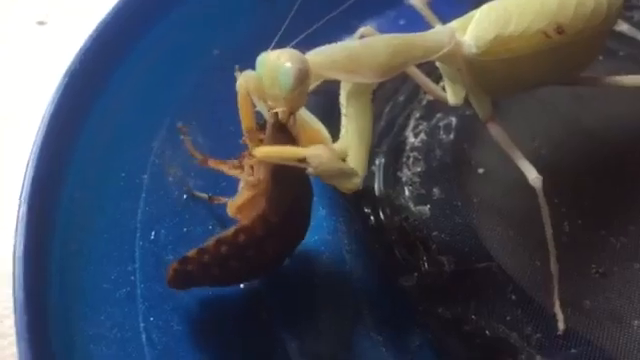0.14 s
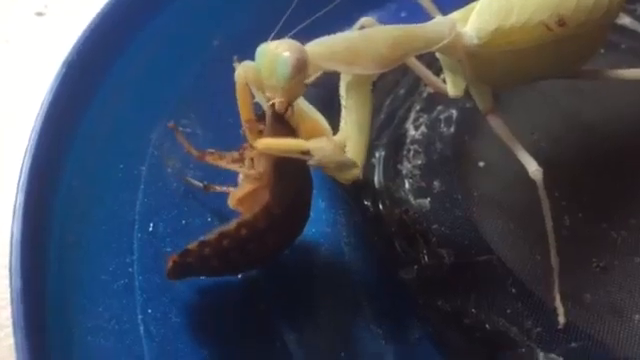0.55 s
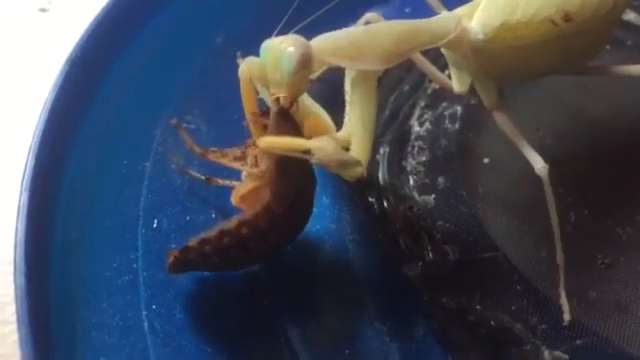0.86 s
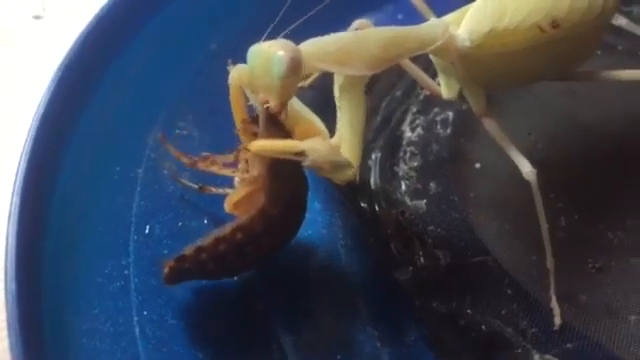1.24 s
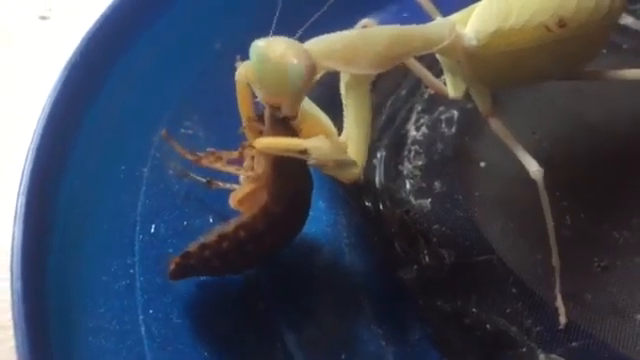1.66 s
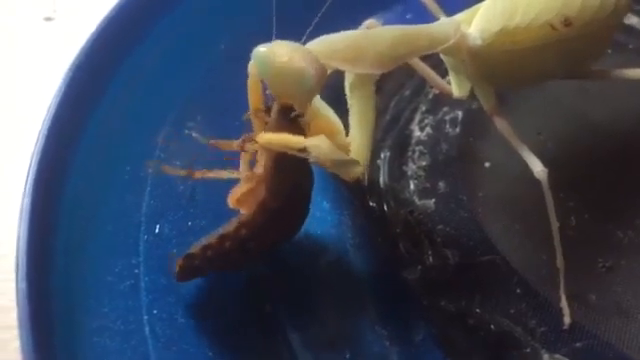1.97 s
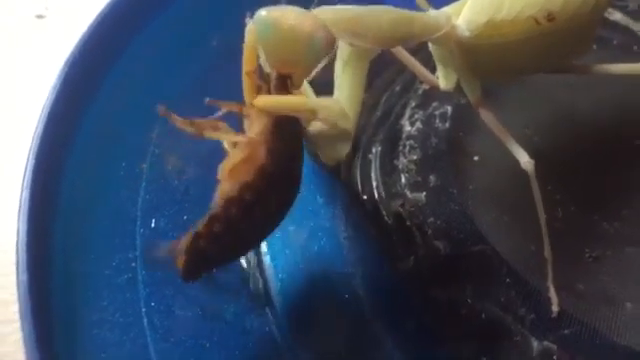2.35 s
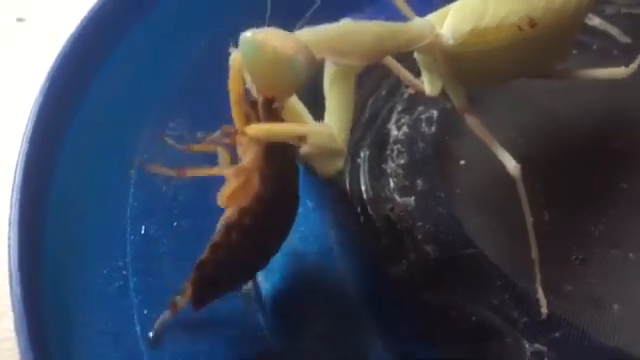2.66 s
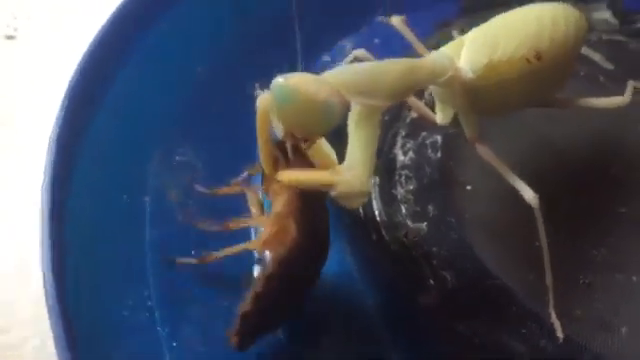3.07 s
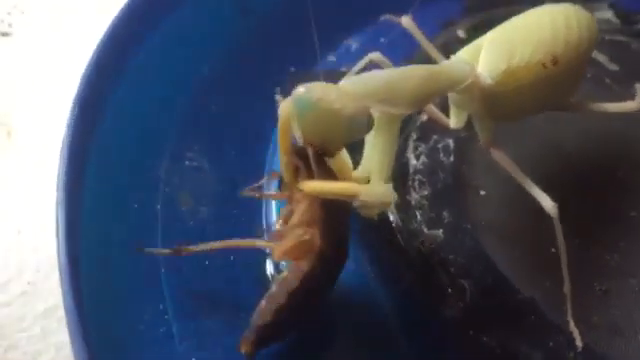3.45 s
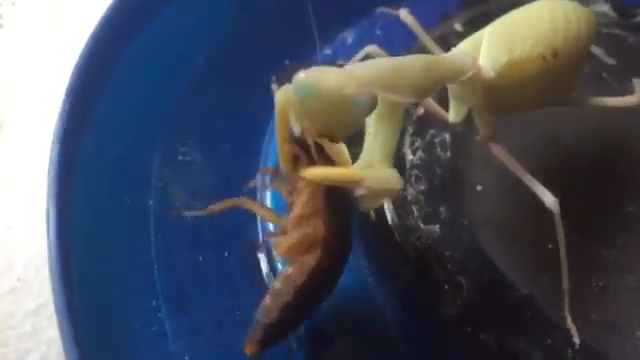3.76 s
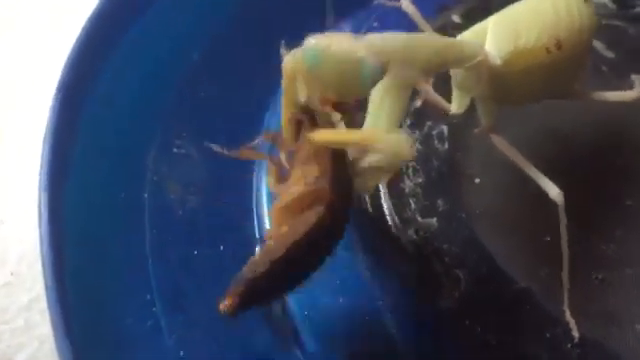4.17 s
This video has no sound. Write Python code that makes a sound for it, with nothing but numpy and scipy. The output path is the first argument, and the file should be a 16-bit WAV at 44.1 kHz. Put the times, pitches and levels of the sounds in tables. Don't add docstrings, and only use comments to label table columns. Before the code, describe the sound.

Sparse, tiny crisp ticks and short dry creaks of an insect chewing shell, very close, over a deep throbbing ventilation drone.

```python
import sys
import numpy as np
from scipy import signal
from scipy.fft import rfft, irfft
from scipy.io import wavfile
from scipy.ndimage import uniform_filter1d

SR = 44100
rng = np.random.default_rng(int(sys.argv[2]) if len(sys.argv) > 2 else 0)


def materialize(psi):
    bounded = np.clip(np.atleast_2d(psi).T, -1, 1)
    quanta = np.round(bounded * 32767).astype(np.int16)
    wavfile.write(sys.argv[1], SR, quanta)


def nominal_scale(level):
    x = np.asarray(level, float) / 20
    return 10 ** x


N = 190011

# start_s, peak_db,
# flake_hz, body_db
SHELL_SNAPS = [(0.0627, -29.5, 10540, -45), (0.0695, -48, 7500, -2), (0.0923, -32.5, 10400, -40),
               (0.1424, -35.5, 11500, -20), (.2426, -25.5, 12150, -21.5), (0.2517, -44, 9600, -8),
               (0.4658, -28.5, 10860, -27), (0.755, -35.5, 10160, -37), (1.083, -35.5, 12200, -16),
               (1.1635, -26, 11500, -41), (1.165, -39, 10700, -13), (1.2076, -48, 9100, -17),
               (1.211, -56, 11000, -20), (2.2988, -40, 7100, -24), (2.316, -38, 8100, -3),
               (2.3328, -56, 9000, 3), (2.6953, -32, 7700, -2), (2.6957, -47, 7700, -14),
               (2.876, -55, 12900, -10), (3.8432, -22.5, 13400, -21), (3.8434, -22.5, 9760, -14),
               (3.8528, -30, 9500, -31), (3.8803, -54, 9450, -13), (3.991, -62, 12100, -5)]
# start_s, peak_db, skid_ms, limb_hz, dish_db
LIMB_SKIDS = [(2.2391, -46.5, 3.5, 2500, -2), (2.245, -40.5, 2.45, 2400, -6),
              (2.2612, -48.5, 3.9, 2500, 0.1), (2.298, -34, 3.2, 3460, -2), (2.3035, -51, 9.0, 4400, -3),
              (2.312, -56, 1.4, 3400, -6), (2.3144, -31.5, 1.2, 3840, 7), (2.32, -57, 16, 3800, -1),
              (2.651, -62, 26, 3340, 3), (2.67, -45, 3.4, 3300, -7), (2.6963, -33, 2.5, 3210, -6.5),
              (2.798, -59, 1.9, 2300, -1), (3.241, -57.5, 4.5, 2320, -3), (3.385, -59, 14, 3000, 3),
              (3.5936, -48, 3.6, 2350, -0.5), (3.805, -57.5, 10, 3260, -1),
              (3.9322, -33.5, 9.9, 2410, -7.5), (4.0095, -51, 2.4, 3020, -9), (4.2794, -58, 3.7, 2210, -5),
              (4.3065, -47, 3.2, 2780, -3)]
# start_s, peak_db, drag_ms, plate_hz
PLATE_DRAGS = [
    (2.574, -55.5, 9.1, 2910),
    (2.693, -36.5, 3.8, 5170),
    (2.696, -32, 2.57, 4320),
    (2.697, -52, 2.3, 2260),
    (3.7476, -64.5, 6, 5530),
    (3.93, -46, 10, 4760),
    (3.935, -41.5, 4.7, 4950),
    (3.9995, -38.5, 3.6, 2970),
    (4.0043, -40, 4.2, 3060),
]
# start_s, peak_db, mode_hz, t60_s
SOFT_BUMPS = [
    (.09, -62, 410, .2),
    (1.216, -58, 960, .06),
    (3.5968, -46, 238, .1),
    (3.597, -50, 415, .11),
    (3.5972, -60, 610, .05),
]
# pitch_hz, density_db (per Hz)
DRONE_SPECTRUM = [(8.8, -66), (18, -21.5), (33, -17.5), (40, -6.5), (52, -9), (65, 7), (75, 11), (90, 5.5),
                  (108, -13.5), (129, -13), (166, -17), (199, -14.5), (262, -25), (340, -56), (580, -120)]
# pitch_hz, density_db (per Hz)
RUSH_SPECTRUM = [(150, -32), (260, 0), (316, -7.5), (396, -13), (437, -12.5), (602, -14), (701, -8.5),
                 (802, -7), (1200, -11.5), (1410, -16.5), (2200, -21.5), (2860, -50), (4840, -120)]
# pitch_hz, density_db (per Hz)
HISS_SPECTRUM = [(1290, -31), (2200, 1.5), (2470, -1), (2570, -3), (3320, -1.5), (4810, -6), (5440, -4.5),
                 (6470, -5.5), (8020, -9), (9770, -7), (10500, -15.5), (11200, -8.5), (12700, -11),
                 (15800, -12)]
# centre_s, change_db, half_length_s
DEEP_LULLS = [(.19, -7.5, 0.19), (.43, -6.5, 0.093), (.7, -16, 0.071), (.79, -3.5, 0.021),
              (.92, -17, 0.096), (1.1, -11, 0.11), (1.33, -3.5, 0.23), (1.68, -7.5, 0.052),
              (1.8, -2, 0.036), (1.9, -4, 0.31), (2.55, -5, 0.39), (2.81, -23, 0.063), (2.94, -6, 0.043),
              (3.2, -5.5, 0.27), (3.28, -4, 0.031), (3.5, -8, 0.21), (3.6, 4, 0.035), (3.78, -6.5, 0.23),
              (3.97, -6.5, 0.086), (4.15, -2.5, 0.21), (4.31, -5.5, 0.17)]
# centre_s, change_db, half_length_s
MIDDLE_GUSTS = [(0.0, 21.5, 0.02), (.2, 1.5, 0.088), (.48, 3, .08), (.82, 9, 0.059), (1.4, 6, 0.12),
                (1.9, 0.5, 0.19), (2.35, 4, 0.58), (2.94, 6, 0.045), (3.32, 4.5, 0.065), (3.64, 6, .08),
                (3.81, 4.5, .08), (4.04, 8, 0.2)]
# centre_s, change_db, half_length_s
UPPER_HUMS = [(.3, 1.5, 0.15), (.7, 6.5, 0.076), (.83, 6, 0.033), (.94, 6, 0.082), (1.35, 8, 0.28),
              (1.55, 5.5, 0.14), (1.68, 12, 0.054), (1.85, 7, 0.026), (3.28, 10, 0.052), (3.6, 12.5, 0.048),
              (3.74, 12, 0.036), (3.91, 8.5, 0.079), (4.04, 11.5, 0.084), (4.31, 2, 0.081)]


def snaps():
    out = np.zeros(N)
    t = np.arange(400) / SR
    click = (t == 0) * 1.0
    edge = peak_one(ring(ring(click, 8900, 0.00084), 17200, 0.0008))
    body = peak_one(ring(ring(click, 3230, 0.002), 5200, 0.003))
    late = np.maximum(t - 0.0005, 0)
    echo_burst = (late / 0.00068) * np.exp(1 - late / 0.00027)
    echo_tail = 0.27 * (late > 0) * np.exp(-late / 0.0023)
    for start_s, peak_db, flake_hz, body_db in SHELL_SNAPS:
        flake = ring(click, 0.85 * flake_hz, 5.0 / flake_hz)
        flake = ring(flake, flake_hz, 3.5 / flake_hz)
        flake = peak_one(ring(flake, 1.2 * flake_hz, 4.5 / flake_hz))
        tick = peak_one(flake + nominal_scale(-20) * edge + nominal_scale(body_db) * body)
        scatter = rng.standard_normal(len(t)) * (echo_burst + echo_tail)
        crackle = peak_one(np.convolve(scatter, tick)[:len(t)])
        crackle_db = -5 - 0.78 * (peak_db + 41)
        add(out, start_s, nominal_scale(peak_db) * (tick + nominal_scale(crackle_db) * crackle))
    return signal.sosfilt(signal.butter(4, 2700, "high", fs=SR, output="sos"), out)


def skids():
    out = np.zeros(N)
    t = np.arange(2000) / SR
    dish_hz = 4000
    slips = []
    for start_s, peak_db, length_ms, limb_hz, dish_db in LIMB_SKIDS:
        slips.append((start_s, peak_db, length_ms, limb_hz, dish_hz, dish_db))
    for start_s, peak_db, length_ms, plate_hz in PLATE_DRAGS:
        overtone_db = -8.5 - 6 * (plate_hz / 1000 - 3)
        slips.append((start_s, peak_db, length_ms, plate_hz, 1.933 * plate_hz, overtone_db))
    bright = signal.butter(2, [5500, 9000], "band", fs=SR, output="sos")
    for start_s, peak_db, length_ms, low_hz, high_hz, high_db in slips:
        phase = np.clip(t / (length_ms / 1000), 0, 1)
        envelope = np.sin(np.pi * phase ** 0.7) ** 0.5
        jerks, grit = rng.standard_normal((2, len(t))) * envelope
        low = peak_one(ring(ring(jerks, low_hz, 0.007), low_hz, 0.0014))
        high = peak_one(ring(ring(jerks, high_hz, 0.0049), high_hz, 0.0033))
        crunch = peak_one(ring(ring(grit, 3250, 0.00028), 5140, 0.00081))
        scratch = peak_one(signal.sosfilt(bright, grit) + 0.92 * grit)
        crunch_db = 1.5 - 1.4 * length_ms
        scratch_db = -12 - 0.91 * length_ms
        creak = low + nominal_scale(high_db) * high + nominal_scale(crunch_db) * crunch + nominal_scale(scratch_db) * scratch
        add(out, start_s, nominal_scale(peak_db) * peak_one(creak))
    return signal.sosfilt(signal.butter(6, 1800, "high", fs=SR, output="sos"), out)


def bumps():
    out = np.zeros(N)
    t = np.arange(SR // 4) / SR
    for start_s, peak_db, mode_hz, t60_s in SOFT_BUMPS:
        decay = nominal_scale(peak_db - 60 * t / t60_s)
        onset = 1 - np.exp(-t * mode_hz * 54)
        add(out, start_s, -decay * onset * np.sin(2 * np.pi * mode_hz * t))
    return out


def ring(x, hz, t60_s):
    radius = nominal_scale(-60 / (t60_s * SR))
    angle = 2 * np.pi * hz / SR
    return signal.lfilter([0, np.sin(angle)], [1, -2 * radius * np.cos(angle), radius ** 2], x)


def peak_one(x):
    return x / np.max(np.abs(x))


def add(track, start_s, sound):
    i = round(start_s * SR)
    track[i:i + len(sound)] += sound[:N - i]


def smear(x):
    half, late = round(0.03 * SR), round(0.01 * SR)
    spread = rng.standard_normal(2 * half + 1) * np.hanning(2 * half + 1)
    wide = signal.fftconvolve(x, spread / np.linalg.norm(spread), mode="same")
    return nominal_scale(-17) * np.concatenate([np.zeros(late), wide])[:N]


def room(x):
    t60_s, level_db = 0.19, -16
    t = np.arange(SR // 3) / SR
    tail = rng.standard_normal(len(t)) * nominal_scale(-60 * t / t60_s) * (t > 0.003)
    tail = signal.lfilter([1], [1, -0.5], tail)
    return nominal_scale(level_db) * signal.fftconvolve(x, tail / np.linalg.norm(tail))[:N]


def duct_drone():
    out = nominal_scale(-69) * coloured(DRONE_SPECTRUM, 0, 45)
    out += nominal_scale(-72.5) * coloured(DRONE_SPECTRUM, 228, 260)
    # low_hz, high_hz, level_db, swells, lump_db
    modes = [(45, 105, -45.5, DEEP_LULLS, 0.84),
             (105, 172, -61.5, MIDDLE_GUSTS, 2.5),
             (172, 228, -65, UPPER_HUMS, 2.5)]
    for low_hz, high_hz, level_db, rows, lump_db in modes:
        band = coloured(DRONE_SPECTRUM, low_hz, high_hz)
        lumps = coloured([(3, 0), (12, 0)], 3, 12)
        mode_db = level_db + swells(rows) + lump_db * lumps
        power = uniform_filter1d(band ** 2, size=2500)
        own_swell = np.sqrt(uniform_filter1d(power, size=2500))
        out += nominal_scale(mode_db) * band / own_swell
    return out


def air_rush():
    return nominal_scale(-68) * coloured(RUSH_SPECTRUM, 260, 2200)


def microphone_hiss():
    return nominal_scale(-74.5) * coloured(HISS_SPECTRUM, 2200, 15750)


def coloured(points, low_hz, high_hz):
    hz = np.maximum(np.arange(N // 2 + 1) * SR / N, 1)
    point_hz, point_db = np.transpose(points)
    shape = nominal_scale(np.interp(np.log(hz), np.log(point_hz), point_db))
    inside = (hz >= low_hz) & (hz < high_hz)
    noise = irfft(rfft(rng.standard_normal(N)) * shape * inside, N)
    return noise / np.sqrt(np.mean(noise ** 2) + 1e-20)


def swells(rows):
    centre_s, change_db, half_s = np.transpose(rows)
    t = np.arange(0, N + 100, 100)[:, None] / SR
    phase = np.clip((t - centre_s) / half_s, -1, 1)
    db = (change_db * np.cos(np.pi / 2 * phase) ** 2).sum(axis=1)
    return np.interp(np.arange(N) / SR, t[:, 0], db)


def scene():
    shell, dish = snaps(), skids()
    chewing = shell + dish + bumps()
    spread = smear(nominal_scale(-12) * shell + nominal_scale(-4.5) * dish)
    reverberation = room(shell + nominal_scale(-2.5) * dish)
    background = duct_drone() + air_rush() + microphone_hiss()
    return (chewing + spread + reverberation + background)[None]


def band_limit(x):
    return signal.sosfilt(signal.butter(12, 16880, fs=SR, output="sos"), x)


def record(dry):
    low_pass = signal.cheby2(10, 60, 16950, fs=SR, output="sos")
    cut = signal.sosfilt(low_pass, dry)
    return band_limit(cut)


dry = scene()
out = record(dry)
materialize(out)
```